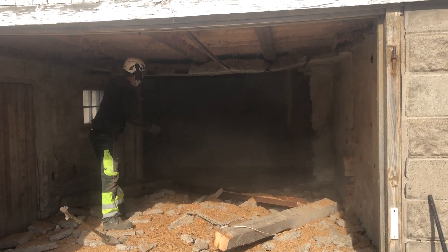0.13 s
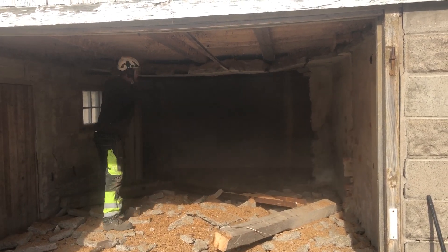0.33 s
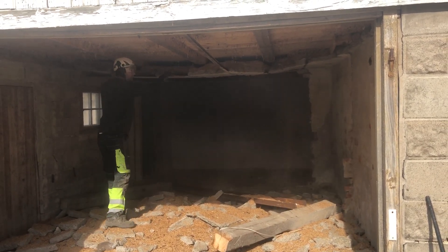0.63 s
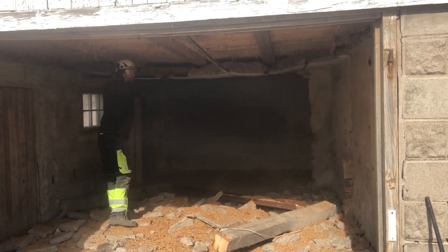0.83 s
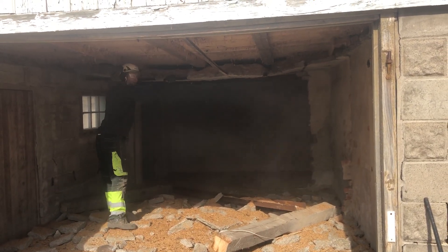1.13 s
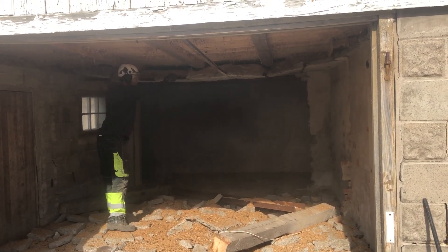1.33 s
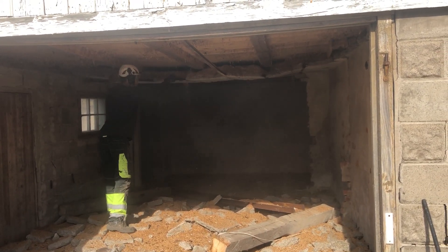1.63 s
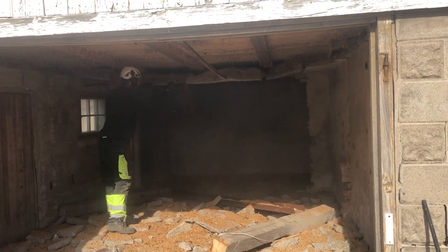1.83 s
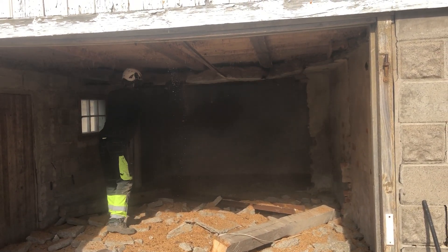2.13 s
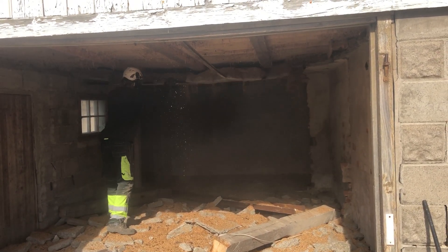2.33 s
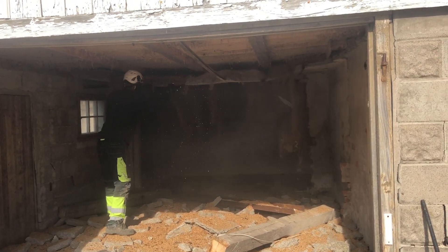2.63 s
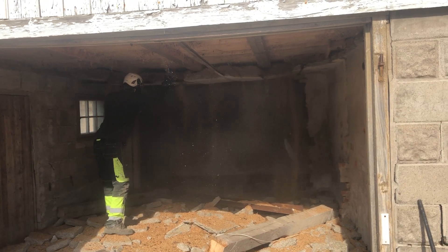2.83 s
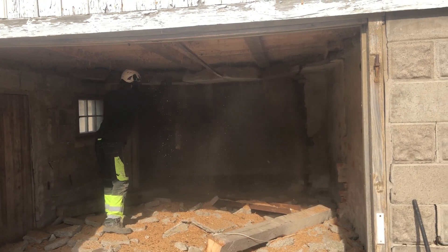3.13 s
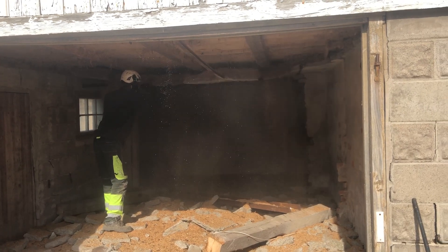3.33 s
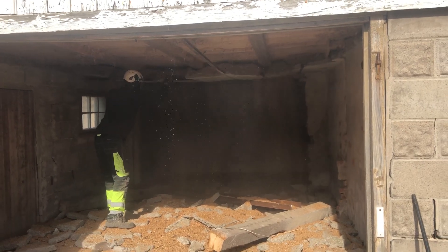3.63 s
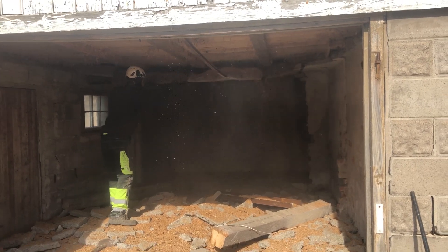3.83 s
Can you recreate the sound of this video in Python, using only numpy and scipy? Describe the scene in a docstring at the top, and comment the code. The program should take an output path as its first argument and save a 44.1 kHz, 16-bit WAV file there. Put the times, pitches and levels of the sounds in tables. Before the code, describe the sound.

Grit falls faintly onto rubble in a stone outbuilding under low wind rumble, with a woody clack at 0.35 s and wind puffs near 0.5 s. From 1.5 s the fine trickle and dull patter thicken. Close, dry creaking ticks cluster at 2.3 and 2.6 s amid wind thumps. A sharper, hollow knock lands at 3.05 s, then debris slides and rustles, with a faint metallic ring at 3.6 s.

```python
"""Falling grit in a stone outbuilding

Grit trickles from a damaged ceiling onto rubble: shaped noise and many small impacts, louder after 1.5 s.
Two larger pieces knock: decaying noise bursts and damped modes. Something close by creaks and ticks in
stick-slip runs, each slip exciting the same modes. Loose debris slides as swelling band noise, and brushed
scrap metal rings faintly. Light wind buffets the microphone in the doorway: low noise with brief puffs."""
import sys
import numpy as np
from scipy import signal
from scipy.fft import rfft, irfft, next_fast_len
from scipy.io import wavfile
from scipy.ndimage import map_coordinates

SR = 44100
rng = np.random.default_rng(int(sys.argv[2]) if len(sys.argv) > 2 else 0)


def dump(signal):
    """Clip the signal to [-1, 1] and save it as 16-bit WAV at the path in sys.argv[1]."""
    limited = np.clip(np.atleast_2d(signal).T, -1, 1)
    pcm = np.round(limited * 32767).astype(np.int16)
    wavfile.write(sys.argv[1], SR, pcm)


N = 176400  # samples: 4 s

# Falling grit, before its surges: (time [s], level of the steady noise [dB])
GRIT_LEVEL = [(0, -72.5), (.7, -68), (.97, -72), (1.43, -65.5), (1.7, -56.5), (2.14, -56), (2.33, -51.5),
              (2.75, -52), (3.22, -49.5), (3.45, -49), (4, -52.5)]
# Spectral shape of the grit: (frequency [Hz], relative level [dB])
GRIT_COLOUR = [(1000, -7), (1800, -6), (2900, -2), (4900, -11), (8200, -13), (12600, -7), (14800, -18.5),
               (16000, -37)]
# Dull patter on the rubble, before its surges: (time [s], level [dB])
PATTER_LEVEL = [(0, -56.5), (.95, -61.5), (1.41, -56), (1.66, -51.5), (2.58, -45), (2.9, -48), (3.3, -45),
                (4, -47)]
# Spectral shape of the patter: (frequency [Hz], relative level [dB])
PATTER_COLOUR = [(120, -2.5), (250, 1.5), (400, -4), (560, 0.5), (760, -2.5), (950, -6.5), (1150, -2),
                 (1450, -8), (2200, -30)]
GRAIN_DB = -1.5  # impacts relative to the steady noise
SURGE_DB, SURGES_PER_S = 2.5, 26  # slow fluctuation: spread of the random knots, and their rate
CLUMP_DB, CLUMPS_PER_S = 1.5, 87  # faster fluctuation, of the fine grit only


def trickle():
    """Granular flow: noise and many small impacts, fine grit over dull patter, with a fluctuating level."""
    fine_noise = coloured(rng.standard_normal(N), GRIT_COLOUR)
    fine_impacts = coloured(grains(), GRIT_COLOUR)
    fine = fine_noise + amp(GRAIN_DB) * fine_impacts
    dull = coloured(rng.standard_normal(N) + amp(GRAIN_DB) * grains(), PATTER_COLOUR)

    surge_db = SURGE_DB * wobble(SURGES_PER_S)
    fine_surge_db = surge_db / 2 + CLUMP_DB * wobble(CLUMPS_PER_S)
    return level(GRIT_LEVEL) * amp(fine_surge_db) * fine + level(PATTER_LEVEL) * amp(surge_db) * dull


GRAINS_PER_S, GRAIN_SPREAD_DB = 400, 2.5  # mean impact rate, and mean size excess before its limit


def grains():
    """Poisson impacts: independent single-sample blows of scattered size at a constant mean rate, at rms 1."""
    excess_db = GRAIN_SPREAD_DB * np.minimum(rng.exponential(size=N), 3)
    struck = rng.random(N) < GRAINS_PER_S / SR
    return unit(struck * amp(excess_db) * rng.choice([-1, 1], N))


# Contacts of heavier pieces, before their spectral shape or modes are applied:
# (time [s], body [dB], crack [dB], hollow thud [dB], woody clack [dB])
KNOCKS = [(.347, -29.5, -36, -37.5, -27), (.351, -44.5, -42, -33.5, -22), (3.048, -24.5, -20.5, -29.5, -54),
          (3.063, -24.5, -28, -23.5, -39)]
# Spectral shape of the body noise: (frequency [Hz], relative level [dB])
KNOCK_COLOUR = [(250, -23), (600, 5.5), (950, -12.5), (1240, -0.5), (1600, -2.5), (2700, 4), (3800, -8.5),
                (6300, -7.5), (11000, -57)]
# Spectral shape of the sharp noise in cracks and slips: (frequency [Hz], relative level [dB])
SNAP_COLOUR = [(400, -19), (1500, 5.5), (4000, 3.5), (8000, 2.5), (13000, 5.5), (15000, 0), (16000, -13)]
# Hollow thud modes: (frequency [Hz], relative level [dB], t60 [s])
THUD_MODES = [(204, 4, 0.094), (334, -4.5, 0.12), (463, -9, 0.052), (662, -5.5, 0.068)]
# Woody clack modes: (frequency [Hz], relative level [dB], t60 [s])
CLACK_MODES = [(901, -7, 0.031), (1156, -2, 0.03), (1252, -3.5, 0.043), (1406, -5, 0.023), (1810, -3, 0.02)]
BODY_T60_S, CRACK_T60_S, KNOCK_ATTACK_S = 0.07, 0.037, 0.00077
KNOCK_WET_DB = -6.5  # gain of the room tail


def knocks():
    """Impact excitation: a contact releases broadband noise and sets damped modes ringing."""
    out, t = np.zeros(N), np.arange(SR // 4) / SR
    for s, body_db, crack_db, thud_db, clack_db in KNOCKS:
        body = amp(body_db - 60 * t / BODY_T60_S) * coloured(rng.standard_normal(len(t)), KNOCK_COLOUR)
        crack = amp(crack_db - 60 * t / CRACK_T60_S) * coloured(rng.standard_normal(len(t)), SNAP_COLOUR)
        thud = amp(thud_db) * ring(THUD_MODES, t)
        clack = amp(clack_db) * ring(CLACK_MODES, t)
        attack = 1 - np.exp(-t / KNOCK_ATTACK_S)
        add(out, s, crack + (body + thud + clack) * attack)
    return out + amp(KNOCK_WET_DB) * room(out)


# Single slips: (time [s], relative level [dB])
SLIPS = [(0.5654, -33), (1.4807, -40), (1.5023, -50), (1.5193, -37.5), (1.6561, -33.5), (1.6618, -32),
         (1.8715, -30.5), (2.2761, -21.5), (2.281, -19), (2.2872, -23.5), (2.364, -24.5), (2.3695, -27),
         (2.614, -23.5), (2.6201, -25.5), (2.6258, -19), (2.6327, -18), (2.6403, -20), (2.6476, -18),
         (2.6533, -19), (2.6569, -20.5), (2.6634, -20.5), (3.0273, -18), (3.0327, -21), (3.0413, -23.5),
         (3.9466, -34.5)]
# Fast runs of slips: (start [s], length [s], rate [slips/s], mean relative level [dB])
SLIP_RUNS = [(2.229, .014, 480, -34), (2.675, .03, 150, -38), (2.752, .036, 540, -26),
             (3.15, .016, 350, -23.5), (3.283, .02, 260, -30)]
# Modes of the creaking part: (frequency [Hz], relative level [dB], t60 [s])
CREAK_MODES = [(695, -12, 0.012), (1312, -14, 0.021), (1466, -22, 0.066), (1883, -16, 0.048),
               (2416, -31.5, 0.085), (3683, -14, 0.021), (6290, -22, 0.026), (6920, -13.5, 0.012),
               (9200, -16, 0.011), (11200, -1, 0.0043), (13000, 2, 0.0034), (14800, -15, 0.0077)]
SLIP_DB, SLIP_ATTACK_S = -1, 0.00033  # gain of all slips, and rise time constant
SNAP_DB, SNAP_T60_S = -2, 0.01  # noise of each slip
CREAK_WET_DB = -6.5  # gain of the room tail


def creak():
    """Stick-slip friction: every sudden slip snaps and excites the modes of the same small part."""
    out, t = np.zeros(N), np.arange(SR // 16) / SR
    slips = [tuple(row) for row in SLIPS]
    for start, length, rate, mean_db in SLIP_RUNS:
        # uneven spacing and strength, drawn for up to 40 slips
        chance = rng.standard_normal((40, 2))
        for k, (shift, change) in enumerate(chance):
            if k < length * rate:
                slips.append((start + (k + 0.22 * shift) / rate, mean_db + 2 * change))

    for s, db in slips:
        snap = amp(SNAP_DB - 60 * t / SNAP_T60_S) * coloured(rng.standard_normal(len(t)), SNAP_COLOUR)
        attack = 1 - np.exp(-t / SLIP_ATTACK_S)
        add(out, s, amp(db + SLIP_DB) * (ring(CREAK_MODES, t) + snap) * attack)
    return out + amp(CREAK_WET_DB) * room(out)


# Slides, scrapes and rustles; the narrow bands ring or squeak:
# (time [s], rise [s], t60 [s], level [dB], centre [Hz], half width at half amplitude [octaves])
SLIDES = [(.113, 0.0063, .16, -55, 2730, 0.015), (.37, 0.043, 0.079, -43.5, 1200, 0.55),
          (0.534, 0.0041, 0.045, -43.5, 1154, 0.11), (0.565, 0.0023, 0.36, -43.5, 7500, 2.6),
          (1.085, 0.066, 0.21, -50.5, 710, 1.2), (2.79, 0.018, 0.13, -39, 10780, 1.3),
          (1.475, 0.046, 0.23, -50, 2470, 5.6), (2.04, 0.06, 0.39, -46.5, 1470, 2.3),
          (2.671, 0.0067, 0.14, -44, 2322, 0.058), (3.174, 0.022, 0.55, -37, 2960, 1.34),
          (3.25, 0.0019, 0.31, -32.5, 805, 0.51), (3.047, 0.0093, 0.17, -27.5, 1310, 2.2),
          (3.53, 0.035, 0.91, -36.5, 1730, 1.3), (3.614, 0.018, 0.49, -39, 3000, 1.4),
          (3.86, 0.01, 0.23, -44, 2900, 0.07), (3.289, 0.0044, 0.077, -38, 4530, 0.047),
          (3.962, 0.0064, 0.54, -37, 1330, 1.55)]
SLIDE_GRAIN = 0.98  # impacts relative to the smooth noise, as an amplitude ratio


def slides():
    """Sliding friction: grainy noise fills a resonant band, swells and decays, for at most 0.5 s."""
    out, t = np.zeros(N), np.arange(SR // 2) / SR
    for s, rise, t60, db, centre_hz, octaves in SLIDES:
        def band(hz):
            return 1 / (1 + (np.log2((hz + 1) / centre_hz) / octaves) ** 2)

        rub = rng.standard_normal(len(t)) + SLIDE_GRAIN * grains()[:len(t)]
        rush = unit(filtered(rub, band))
        swell = np.minimum(t / rise, 1)
        decay = amp(db - 60 * np.maximum(t - rise, 0) / t60)
        add(out, s, rush * swell * decay)
    return out


# The brush against scrap metal: (time [s], level before the mode levels [dB])
SCRAP_AT = (3.635, -42.5)
# Modes of the scrap metal: (frequency [Hz], relative level [dB], t60 [s])
SCRAP_MODES = [(704, -6.5, 0.97), (886, 0.5, 0.59)]


def scrap():
    """Lightly damped modes: the brushed metal rings on faintly, for at most 0.5 s."""
    out, t = np.zeros(N), np.arange(SR // 2) / SR
    s, db = SCRAP_AT
    attack = 1 - np.exp(-t / KNOCK_ATTACK_S)
    add(out, s, amp(db) * ring(SCRAP_MODES, t) * attack)
    return out


# Wind rumble, before its fluctuation: (time [s], level [dB])
WIND_LEVEL = [(0, -46), (.03, -31), (.33, -31.5), (.39, -36), (.43, -30.5), (.52, -32.5), (.68, -37.5),
              (.79, -53), (.91, -38), (1.07, -51.5), (1.45, -60), (1.7, -53.5), (2.03, -57.5), (2.3, -41),
              (2.6, -30), (2.8, -48), (2.99, -38), (3.4, -46.5), (3.66, -43.5), (4, -39)]
# Spectral shape of the rumble: (frequency [Hz], relative level [dB])
WIND_COLOUR = [(20, -48), (35, -15), (60, 2.5), (120, -3.5), (240, -16.5), (400, -28.5), (800, -46),
               (1500, -57)]
# Sharp puffs: (centre [s], Gaussian half length [s], level at the centre [dB], upper edge [Hz])
PUFFS = [(.24, 0.019, -38.5, 280), (0.287, 0.0058, -35.5, 380), (.329, 0.0025, -29, 450),
         (0.459, 0.0064, -25, 474), (0.478, 0.0066, -26.5, 317), (0.606, 0.026, -39.5, 242),
         (0.897, 0.004, -39.5, 290), (0.97, 0.0088, -46.5, 317), (2.379, 0.006, -26, 151),
         (2.451, 0.007, -29.5, 146), (2.523, 0.0026, -23, 287), (2.546, 0.0094, -21, 294),
         (2.588, 0.0048, -23.5, 400), (2.645, 0.0047, -23, 504), (2.661, 0.0027, -21.5, 393),
         (2.689, 0.021, -32.5, 253), (2.895, 0.014, -33, 156), (3.822, 0.011, -29.5, 127)]
LUMP_DB, LUMPS_PER_S = 3, 24  # fluctuation: spread of the random knots, and their rate
PUFF_LOW_HZ, PUFF_SLOPE = 78, 3.7  # lower edge, and exponent of the fall above the upper edge


def wind():
    """Turbulent pressure on a microphone: fluctuating low rumble, with brief puffs that reach higher."""
    fluctuation = amp(LUMP_DB * wobble(LUMPS_PER_S))
    rumble = coloured(rng.standard_normal(N), WIND_COLOUR)
    out = level(WIND_LEVEL) * fluctuation * rumble

    t = np.arange(-SR // 8, SR // 8) / SR
    for s, half, db, edge_hz in PUFFS:
        def band(hz):
            low_cut = hz ** 2 / (hz ** 2 + PUFF_LOW_HZ ** 2)
            return low_cut / (1 + (hz / edge_hz) ** PUFF_SLOPE)

        air = filtered(rng.standard_normal(len(t)), band)
        swell = np.exp(-.5 * (t / half) ** 2)
        puff = unit(air * swell) * np.sqrt(np.mean(swell ** 2))
        add(out, s + t[0], amp(db) * puff)
    return out


WALL_GAIN, WALL_SPREAD_S = 0.19, .02  # strength of each reflection, and longest delay


def walls(x, count=9):
    """Early reflection: weak delayed copies of either sign return from the stone walls."""
    out = x.copy()
    for delay, sign in zip(rng.random(count), rng.choice([-1, 1], count)):
        add(out, delay * WALL_SPREAD_S, sign * WALL_GAIN * x)
    return out / np.sqrt(1 + count * WALL_GAIN ** 2)


# Reverberation of the outbuilding: (frequency [Hz], t60 [s])
ROOM_T60 = [(150, 0.22), (1200, 0.3), (3000, 0.31), (8000, 0.25), (15000, 0.42)]


def room(x):
    """Reverberation: convolution with noise whose decay time depends on frequency, delayed by 5 ms."""
    hz, t, z = signal.stft(rng.standard_normal(SR // 2), SR, nperseg=256)
    decay = amp(-60 * t / along(ROOM_T60, hz)[:, None])
    tail = signal.istft(z * decay, SR, nperseg=256)[1]
    response = np.pad(tail / np.linalg.norm(tail), (SR // 200, 0))
    return signal.fftconvolve(x, response)[:N]


def ring(modes, t):
    """Modal superposition: exponentially damped sines, of random phase and slightly varied level."""
    out = np.zeros(len(t))
    for hz, db, t60 in modes:
        decay = amp(db + rng.normal(0, 0.52) - 60 * t / t60)
        out += decay * np.sin(2 * np.pi * (hz * t + rng.random()))
    return out


def wobble(rate):
    """Smooth random fluctuation: a spline through random knots of unit spread, at rate knots a second."""
    return map_coordinates(rng.standard_normal(1024), [clock() * rate])


def coloured(x, colour):
    """Spectral shaping: x filtered to (frequency [Hz], level [dB]) points, at rms 1."""
    return unit(filtered(x, lambda hz: amp(along(colour, hz))))


def filtered(x, response):
    """Linear filtering: the spectrum of x times a response of frequency, with zero padding."""
    m = next_fast_len(len(x) + SR // 8)
    return irfft(rfft(x, m) * response(np.fft.rfftfreq(m, 1 / SR)), m)[:len(x)]


def along(points, hz):
    """Logarithmic frequency scale: (frequency [Hz], value) points interpolated at hz."""
    f, v = np.transpose(points)
    return np.interp(np.log(hz + 1), np.log(f + 1), v)


def level(rows):
    """Amplitude envelope: gain per sample from (time [s], level [dB]) points."""
    return amp(np.interp(clock(), *np.transpose(rows)))


def clock():
    """Sampled time: seconds at every sample."""
    return np.arange(N) / SR


def amp(db):
    """Decibel law: amplitude ratio of a level in dB."""
    return 10 ** (np.asarray(db) / 20)


def unit(x):
    """Power normalisation: x at rms 1."""
    return x / np.sqrt(np.mean(x ** 2) + 1e-20)


def add(out, s, x):
    """Superposition: x mixed into out from time s."""
    part = out[max(round(s * SR), 0):][:len(x)]
    part += x[:len(part)]


def scene():
    """Superposition of sources: wind at the microphone, debris inside the walls, and the closer sounds."""
    return (wind() + walls(trickle() + slides()) + creak() + knocks() + scrap())[None]


# Microphone response, a notch near 1.6 kHz: (frequency [Hz], gain [dB])
MIC_RESPONSE = [(1450, 1), (1540, -2), (1630, -9), (1740, -5), (1830, -2)]
TOP_HZ = 15850  # upper band limit


def record(dry):
    """Transducer response: the microphone's notch, and nothing above the band limit."""
    def response(hz):
        return amp(along(MIC_RESPONSE, hz)) * (hz < TOP_HZ)

    return np.array([filtered(x, response) for x in dry])


dry = scene()
out = record(dry)
dump(out)
```